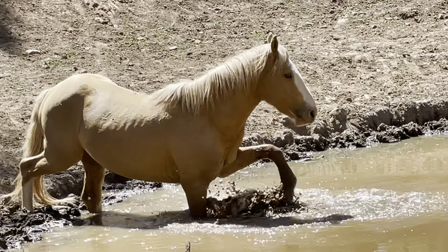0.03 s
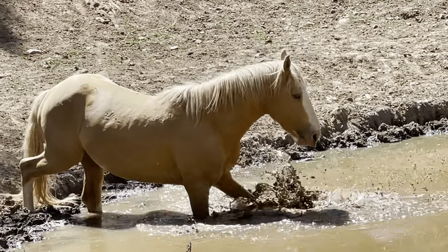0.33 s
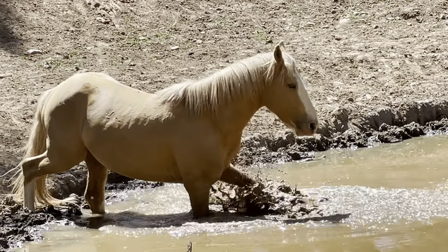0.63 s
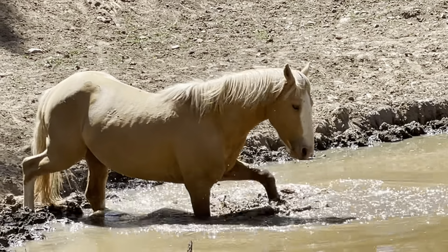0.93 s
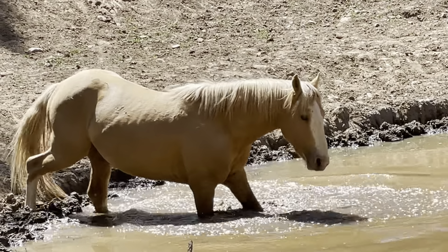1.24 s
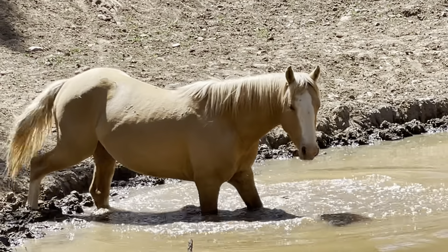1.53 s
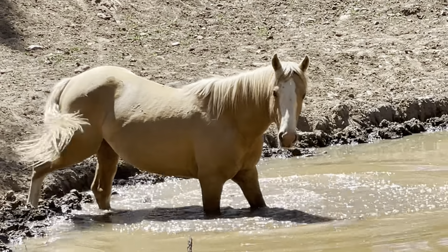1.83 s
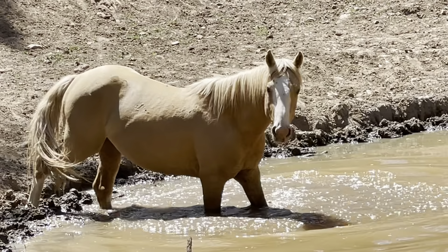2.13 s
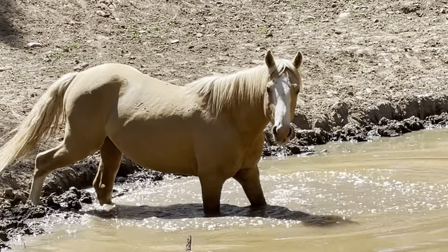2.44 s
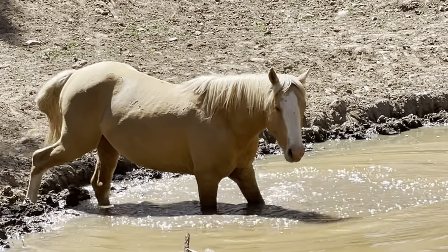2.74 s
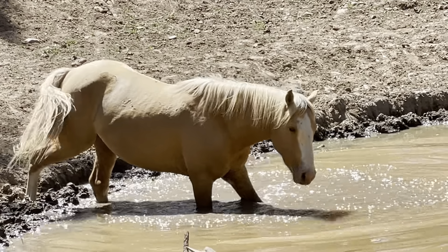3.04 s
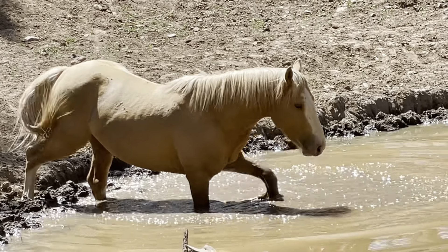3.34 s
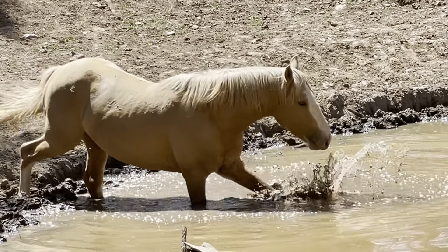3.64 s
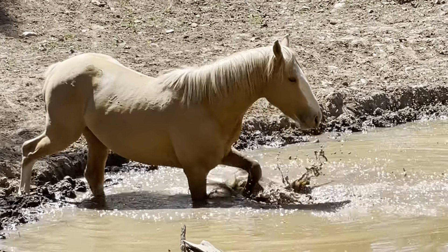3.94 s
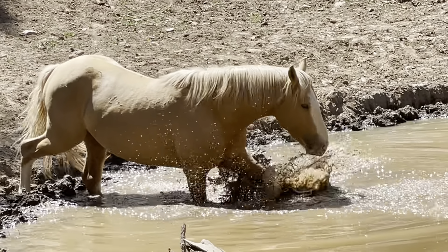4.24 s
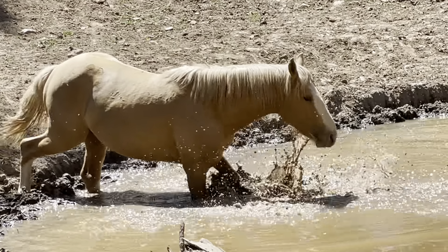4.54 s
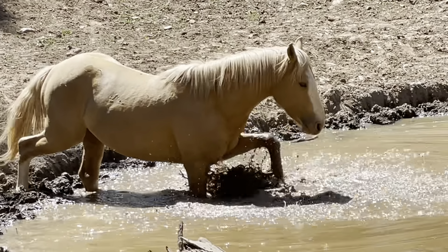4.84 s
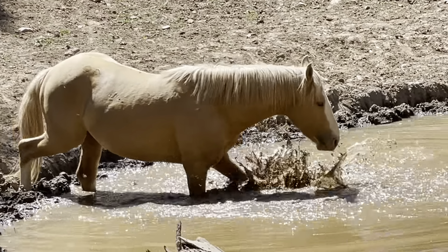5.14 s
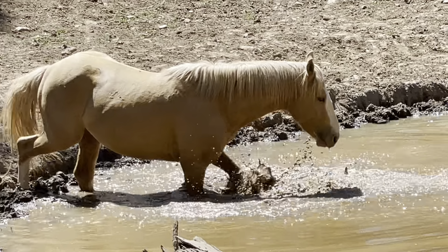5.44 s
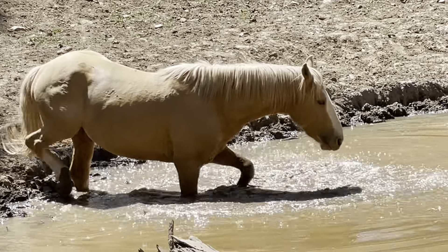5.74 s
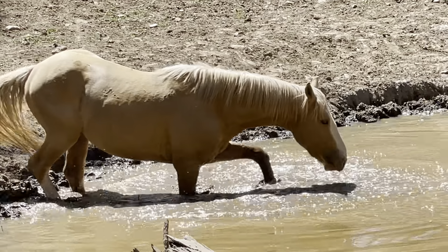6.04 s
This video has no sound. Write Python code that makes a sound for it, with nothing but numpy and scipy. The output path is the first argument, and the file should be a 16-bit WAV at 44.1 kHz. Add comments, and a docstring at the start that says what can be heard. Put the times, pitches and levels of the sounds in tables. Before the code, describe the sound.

Outdoors at a water hole, a horse's hoof splashes straight ahead, a few metres away, each stroke a wet slap with hollow sloshing and a shower of drops. After about a second the water settles into a quiet pause with tiny drips and light wind. The pawing returns with about four stronger strokes, then lighter splashes and plinks, while a faint gust rumbles on the microphone.

```python
"""A horse pawing at a water hole

A horse paws at muddy water some metres away, rests for about two seconds, then paws again.
Each stroke slaps the surface, churns air under it and throws up spray. Air pockets behind the leg
close with gulps. Single drops plink as the water settles, and the tail flicks faintly twice.
The bank gives a short echo, and a soft wind blows throughout."""
import sys
import numpy as np
from scipy import signal
from scipy.fft import rfft, irfft, next_fast_len
from scipy.io import wavfile
from scipy.ndimage import map_coordinates

SR = 44100
rng = np.random.default_rng(int(sys.argv[2]) if len(sys.argv) > 2 else 0)


def transcribe(signal):
    """Save signal, clipped to [-1, 1], as a 16-bit WAV file at the path in sys.argv[1]."""
    frames = np.atleast_2d(signal).T
    limited = np.clip(frames, -1, 1)
    pcm = np.round(limited * 32767).astype(np.int16)
    wavfile.write(sys.argv[1], SR, pcm)


N = 276948

# Hoof and sheets of water hit the surface. Each row: start in seconds, relative level in dB,
# length in seconds, extra dB for the dull shove of water (heavy blows go deeper).
SURFACE_SLAPS = [(0.105, -32, 0.011, -10.5), (0.168, -29.5, 0.019, -13), (0.297, -28, 0.021, -30),
                 (2.192, -59.5, 0.07, -13), (3.512, -41.5, .01, -28), (3.696, -28, 0.011, -13),
                 (3.709, -28, 0.017, -11), (3.915, -34.5, .015, 0.5), (4.06, -24.5, 0.019, -8),
                 (4.314, -31.5, .016, -11.5), (4.361, -23, 0.015, -12), (4.752, -30.5, 0.047, -15),
                 (5.127, -29.5, 0.037, -20), (5.263, -46.5, 0.027, 9), (5.328, -33, 0.021, -13.5),
                 (5.651, -31, 0.0059, -23), (5.8866, -34, 0.0061, -26), (5.937, -41, 0.024, -22),
                 (6.143, -40, 0.017, -22)]
# Pawing strokes. Each row: when the hoof plunges and when the hollow behind it closes in seconds,
# then the relative level of the churning at those two moments in dB.
PAW_STROKES = [(0.073, 0.658, -51, -42.5), (3.695, 4.083, -52.5, -36.5), (4.337, 4.75, -42.5, -43.5),
               (5.085, 5.504, -41.5, -45.5)]
# Water thrown up by the leg. Each row: start in seconds, relative levels of burst and shower in dB,
# flight time and spread of the landing in seconds, mist compared with the drops in dB.
WATER_THROWS = [(0.075, -46.5, -48.5, .19, 0.074, -12.5), (0.479, -45, -51.5, 0.18, .04, -12.5),
                (0.606, -47, -54.5, .32, .127, -7.5), (0.914, -48, -58, 0.23, 0.13, -8.5),
                (3.52, -51.5, -54.5, 0.095, 0.063, -17.5), (3.655, -48, -50.5, 0.36, 0.22, -12),
                (4.03, -48.5, -46, 0.14, 0.096, -11.5), (4.33, -45.5, -48.5, 0.26, .107, -9),
                (4.721, -43, -52, 0.21, 0.16, -10.5), (5.073, -46, -53, 0.32, 0.067, -10),
                (5.453, -47, -54.5, .18, 0.14, -10.5), (5.838, -54.5, -64, 0.37, 0.093, -9)]
# The biggest air pockets. Each row: time of the peak in seconds, relative level in dB, pitch in Hz,
# length in seconds, pitch slide in octaves per length.
AIR_POCKETS = [(0.115, -30.5, 284, 0.011, 0.17), (0.353, -41.5, 216, 0.04, -0.29),
               (0.523, -40.5, 248, 0.025, 0.096), (0.555, -38.5, 176.7, 0.025, -0.19),
               (0.6, -41.5, 146.5, 0.04, -0.15), (0.639, -33.5, 270.7, 0.024, 0.411),
               (0.659, -37, 352, 0.024, 0.29), (0.684, -40, 620, 0.013, 0.218),
               (0.809, -43.5, 398.5, 0.018, 0.23), (0.888, -36.5, 524, 0.017, 0.31),
               (3.599, -40.5, 364, 0.022, 0), (3.718, -32.5, 369.7, 0.018, 0.15),
               (3.853, -40, 146.5, 0.04, 0), (3.92, -28, 339.7, 0.011, 0), (4.071, -32, 263, 0.011, -0.034),
               (4.084, -47, 364, 0.01, 0), (4.211, -38.5, 360, 0.045, 0.21),
               (4.373, -33.5, 326.3, 0.012, 0), (4.525, -38.5, 179.3, 0.03, 0),
               (4.587, -31.5, 111.6, 0.016, -0.17), (4.73, -37, 179, 0.03, 0.293),
               (4.758, -22, 271, 0.019, 0.29), (5.133, -34, 353, 0.03, 0.094),
               (5.15, -36, 221.4, 0.025, -0.016), (5.262, -27, 338, 0.015, 0.044),
               (5.272, -30.5, 141, 0.015, -0.4), (5.33, -36, 509.5, 0.025, 0.12),
               (5.442, -32, 247.4, 0.016, 0), (5.46, -37.5, 171, 0.022, 0.44),
               (5.489, -25, 299.6, 0.022, 0.35), (5.662, -35.5, 600, 0.013, -0.23),
               (5.719, -43.5, 323.4, 0.018, 0.3)]
# Single drops, and at 4.316 s the bright splat of a hoof's hit. Each row: time in seconds, relative level in
# dB, pitch in Hz.
SINGLE_DROPS = [(1.238, -57, 6148), (1.449, -78, 5260), (1.672, -74, 3250), (1.723, -71, 3880),
                (2.238, -69, 3440), (2.243, -59.5, 1950), (2.398, -78, 6080), (3.29, -74, 3531),
                (3.314, -74, 5750), (3.489, -69, 3850), (4.316, -41, 2930), (5.779, -50, 2290),
                (5.849, -50, 1930), (6.092, -49.5, 1730), (6.158, -50, 1750), (6.256, -48.5, 1940)]
# Swells of tail hiss, wind rumble and puffs of air on the microphone.
# Each row: time of the peak in seconds, relative level in dB, half length in seconds.
TAIL_FLICKS = [(2.58, -85, .03), (3.1, -81, 0.024)]
WIND_GUSTS = [(4.3, -61, 0.62), (5.5, -52.5, 0.23)]
WIND_PUFFS = [(.21, -49, .05), (.33, -58, 0.11), (.78, -68, 0.11)]
# The tone of spray, churning water, rushing air and wind rumble.
# Each row: frequency in Hz, relative level in dB.
SPRAY_TONE = [(300, -28), (620, -2), (850, -10), (1300, -11.5), (1650, -7), (2050, -7.5), (2450, -11.5),
              (2800, -16), (3600, -17), (4700, -25), (5600, -28.5), (6700, -22.5), (8000, -22.5),
              (10300, -32), (13000, -27), (15500, -33)]
CHURN_TONE = [(20, -54), (40, -23), (90, -9), (150, -8), (290, -3), (380, 1), (440, -8.5), (540, -0.5),
              (700, -16.5), (1000, -24), (2000, -60)]
AIR_TONE = [(25, -13), (70, -6.5), (160, -2.5), (400, -3), (700, -3), (1100, -9.5), (1700, -19),
            (2300, -31), (3000, -40.5), (4500, -49), (7000, -45), (10000, -60), (13000, -44), (15500, -49)]
RUMBLE_TONE = [(16, -45), (25, -22), (40, -5), (56, 6.5), (75, 7), (105, 3), (150, -2.5), (300, -43.5)]
# The echo of the muddy bank. Each row: frequency in Hz, seconds it takes to fade by 60 dB.
ECHO_FADE = [(150, 0.013), (700, 0.15), (3000, 0.19), (12000, 0.27)]
# How far the left microphone's wave runs ahead of the right one's.
# Each row: frequency in Hz, half the phase difference in radians.
LEFT_LEAD = [(300, 0), (700, -.08), (1900, 0), (2500, .18), (4000, .32), (5200, .15), (5700, -.55),
             (7000, -.6), (8000, -1.1), (8800, -1.57), (9800, -2.0), (11000, -2.35), (13000, -2.85),
             (15000, -3.14)]


def slaps():
    """A slap is a short, dense crackle of bursting drops over a longer, dull shove of water."""
    burst, push = np.zeros((2, N + SR))
    age = np.arange(SR // 6) / SR
    attack = 1 - np.exp(-age / .002)
    for start, db, length, shove_db in SURFACE_SLAPS:
        span = slice(round(start * SR), round(start * SR) + len(age))
        burst[span] += amp(db) * attack * np.exp(-(age / length) ** 2)
        push[span] += amp(db + shove_db) * attack * np.exp(-(age / (length * 1.86)) ** 2)
    crackle = bubbles(low_hz=600, high_hz=15000, cycles=1, spread_db=1.5, count=20000, samples=80)
    shove = coloured(rng.standard_normal(N), CHURN_TONE)
    return amp(-12.5) * burst[:N] * coloured(crackle, SPRAY_TONE) + push[:N] * shove


def leg_drag():
    """The leg drags a hollow that deepens, then shuts fast. Gives its strength and pitch in octaves."""
    attack_s, release_s, closing_s = 0.005, 0.032, 0.1
    entry_hz, deep_hz, closed_hz = 343, 139, 380
    t, gain, pitch_points = clock(), 0, []
    for plunge, close, plunge_db, close_db in PAW_STROKES:
        rise = 1 - np.exp(-np.maximum(t - plunge, 0) / attack_s)
        fall = np.exp(-np.maximum(t - close, 0) / release_s)
        gain = gain + rise * fall * amp(np.interp(t, [plunge, close], [plunge_db, close_db]))
        pitch_points += [(plunge, entry_hz), (close - closing_s, deep_hz), (close, closed_hz)]
    times, hz = np.transpose(pitch_points)
    return gain, np.interp(t, times, np.log2(hz))


def churn(drag, hollow_pitch, drops_gain):
    """Leg and falling spray stir in fat bubbles; those near the hollow's pitch ring loudest."""
    swarm = bubbles(low_hz=90, high_hz=900, cycles=1.5, spread_db=1.2, count=4000, samples=700)
    swarm = coloured(swarm, CHURN_TONE)
    ringing = 0
    for octave in np.arange(7, 10, .5):  # bands from 128 Hz upward
        band = unit(filtered(swarm, lambda hz: np.exp(-((np.log2(hz + 1) - octave) / 0.17) ** 2)))
        ringing = ringing + band * np.exp(-((hollow_pitch - octave) / 0.8) ** 2)
    stirred = np.hypot(drag, drops_gain)
    return (amp(-4.5) * stirred * swarm + amp(-15) * drag * unit(ringing)) * amp(0.43 * wobble(30))


def thrown_water():
    """Water bursts up, showers down and trickles off the leg. Gives the strength of drops and mist."""
    attack_s, burst_fade_s, trickle_fade_s = 0.01, 0.11, 0.22
    drops_power, mist_power, t = 0, 0, clock()
    for start, burst_db, shower_db, flight, scatter, mist_db in WATER_THROWS:
        age = np.maximum(t - start, 0)
        rise = 1 - np.exp(-age / attack_s)
        burst = amp(burst_db) * rise * np.exp(-age / burst_fade_s)
        shower = amp(shower_db) * rise * np.exp(-.5 * ((age - flight) / scatter) ** 2)
        trickle = amp(shower_db - 0.7) * rise * np.exp(-np.abs(age - flight) / trickle_fade_s)
        drops_power += burst ** 2 + shower ** 2 + trickle ** 2
        mist_power += amp(mist_db) ** 2 * (burst ** 2 + shower ** 2 + (amp(-15) * trickle) ** 2)
    return np.sqrt(drops_power), np.sqrt(mist_power)


def spray(drops_gain, mist_gain):
    """Drops patter back in clumps: ticks as they hit, ringing bubbles and a fine fizz."""
    ticks = bubbles(low_hz=1200, high_hz=15000, cycles=.7, spread_db=2.8, count=4500, samples=80)
    rings = bubbles(low_hz=700, high_hz=5000, cycles=4, spread_db=2.2, count=8000, samples=350)
    patter = amp(-5) * ticks + amp(-4) * rings + rng.standard_normal(N)
    patter = coloured(patter, SPRAY_TONE) * amp(0.47 * wobble(70) + 0.81 * wobble(30))
    mist = filtered(patter, lambda hz: 1 / (1 + (4800 / (hz + 1)) ** 8))  # finest drops: the treble
    return amp(-1.28) * drops_gain * unit(patter - mist) + amp(-0.5) * mist_gain * unit(mist)


def gulps():
    """An air pocket rings like a big bubble: its pitch climbs as it shrinks and sinks as it opens."""
    out, t = np.zeros(N), clock()
    ragged_phase, ragged_gain = .3 * wobble(130), amp(1.3 * wobble(170))
    for peak, db, hz, length, slide in AIR_POCKETS:
        near = np.abs(t - peak) < 3 * length
        progress = (t[near] - peak) / length
        sliding_hz = hz * 2 ** (slide * np.clip(progress, -1.5, 1.5))
        phase = 2 * np.pi * (np.cumsum(sliding_hz) / SR + rng.random())
        swell = 2 / (np.exp(-4.2 * progress) + np.exp(3.2 * progress))
        out[near] += amp(db) * swell * np.sin(phase + ragged_phase[near])
    return amp(-0.5) * out * ragged_gain


def drips():
    """A lone drop, or the bright splat of a hit, ticks on the surface and traps one bubble, which plinks
    unsteadily."""
    out, t = np.zeros(N + SR), np.arange(SR // 16) / SR
    ragged_phase = 1.2 * wobble(600)
    shape = (1 - np.exp(-t / 0.0006)) * np.exp(-t / 0.0034)
    for when, db, hz in SINGLE_DROPS:
        start = round((when - .002) * SR)
        plink = np.sin(2 * np.pi * hz * t * (1 + 1.9 * t) + np.roll(ragged_phase, -start)[:len(t)])
        tick = signal.lfilter([1], [1, -.8], rng.standard_normal(len(t)))
        out[start:][:len(t)] += amp(db + 5.0) * shape * (plink + amp(-16.5) * tick)
    return out[:N]


def tail_flicks():
    """Long hairs brush the horse's side with a thin, faint hiss."""
    brushing = rng.standard_normal(N) * amp(3.6 * wobble(150))
    hiss = coloured(brushing, [(1000, -22), (3000, 6), (9000, -14), (12000, 6), (16000, -1)])
    return swells(TAIL_FLICKS) * hiss


def bank_echo(sound):
    """The rough bank scatters a brief echo to each ear, 10 milliseconds late."""
    hz, t, noise = signal.stft(rng.standard_normal((2, SR // 3)), SR, nperseg=256)
    fade = amp(-60 * t / along(ECHO_FADE, hz)[:, None])
    echo = signal.istft(noise * fade, SR, nperseg=256)[1]
    delayed = np.pad(sound, (SR // 100, 0))[None]
    return signal.fftconvolve(delayed, echo / np.linalg.norm(echo[0]), axes=1)[:, :N]


def wind():
    """A gusting rumble, a soft rush of air, and puffs that push the two microphones opposite ways."""
    rumble_gain = np.hypot(amp(-61), swells(WIND_GUSTS)) * amp(1.8 * wobble(15))
    rumble = rumble_gain * stereo_noise(RUMBLE_TONE, width_db=-27.0)
    rush = amp(-59.0 + 1.3 * wobble(3.76)) * stereo_noise(AIR_TONE, width_db=-5.5)
    puff_tone = [(15, -36), (40, 4), (75, -2), (150, -11), (400, -41), (1500, -68)]
    puffs = swells(WIND_PUFFS) * coloured(rng.standard_normal(N), puff_tone)
    lean_left = amp([[.4], [-.4]])
    return (rumble + rush) * lean_left + np.array([puffs, -puffs])


def bubbles(low_hz, high_hz, cycles, spread_db, count, samples):
    """A swarm of bubbles, each ringing briefly at a random time; only a few are loud."""
    when, pitch, life, rank = rng.random((4, count, 1))
    hz = low_hz * (high_hz / low_hz) ** pitch
    turns = hz * np.arange(samples) / SR
    age = turns / (cycles * (.5 + life))
    strength = hz * amp(-spread_db * np.log(np.maximum(rank, .01)))
    pitch_rise = 1 + 0.032 * np.minimum(age, 10)  # as the bubble nears the surface
    ring = strength * np.exp(-age) * np.sin(2 * np.pi * turns * pitch_rise)
    positions = (when * N).astype(int) + np.arange(samples)
    return unit(np.bincount(positions.ravel(), ring.ravel(), N)[:N])


def stereo_noise(tone, width_db):
    """Noise with a given tone, whose low notes differ between left and right."""
    mid, side = coloured(rng.standard_normal((2, N)), tone)
    side = amp(width_db) * filtered(side, lambda hz: 1 / (1 + (hz / 2200) ** 2))
    return np.array([mid + side, mid - side])


def swells(rows):
    """A volume curve with one smooth hump for each row."""
    t = clock()
    return np.sqrt(sum((amp(db) * np.exp(-((t - peak) / half) ** 2)) ** 2 for peak, db, half in rows))


def wobble(rate):
    """A smooth curve through `rate` random values a second."""
    return map_coordinates(rng.standard_normal(int(N * rate / SR) + 4), [clock() * rate])


def coloured(x, tone):
    """Shape a sound with (Hz, dB) points, then scale it to strength 1."""
    return unit(filtered(x, lambda hz: amp(along(tone, hz))))


def filtered(x, response):
    """Multiply each frequency in a sound by response(hz)."""
    size = next_fast_len(N + SR // 2)
    return irfft(rfft(x, size) * response(np.fft.rfftfreq(size, 1 / SR)), size)[..., :N]


def along(points, hz):
    """Read between (Hz, value) points, with octaves evenly spaced."""
    point_hz, values = np.transpose(points)
    return np.interp(np.log(hz + 1), np.log(point_hz), values)


def amp(db):
    """Turn decibels into a multiplier."""
    return 10 ** (np.asarray(db) / 20)


def unit(x):
    """Scale to an average strength (rms) of 1."""
    return x / np.sqrt(np.mean(x ** 2) + 1e-20)


def clock():
    """The time of every sample in seconds."""
    return np.arange(N) / SR


def scene():
    """The horse straight ahead, the echo of the bank and the wind."""
    drag, hollow_pitch = leg_drag()
    drops_gain, mist_gain = thrown_water()
    # The dragging leg also tears drops and mist off the wave in front of it.
    splashes = spray(np.hypot(drops_gain, amp(-10) * drag), np.hypot(mist_gain, amp(-22) * drag))
    horse = splashes + churn(drag, hollow_pitch, drops_gain) + slaps() + gulps() + drips() + tail_flicks()
    return horse + amp(-21.5) * bank_echo(horse) + wind()


def record(dry):
    """Two close microphones hear the treble out of step. The first instant and top treble are cut."""
    start_s, top_hz = .083, 15850
    pair = filtered(dry, lambda hz: np.exp(np.outer([1j, -1j], along(LEFT_LEAD, hz))))
    return filtered(pair * (clock() > start_s), lambda hz: hz < top_hz)


dry = scene()
out = record(dry)
transcribe(out)
```